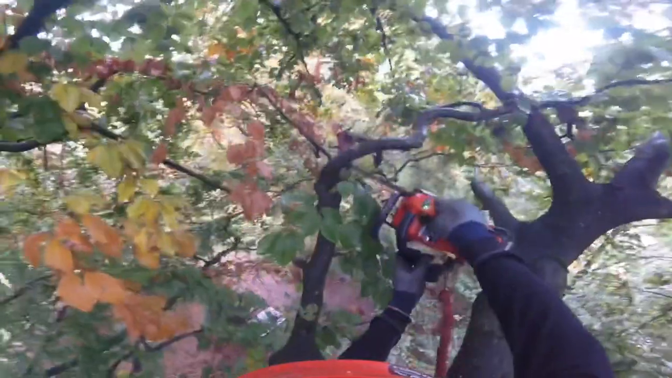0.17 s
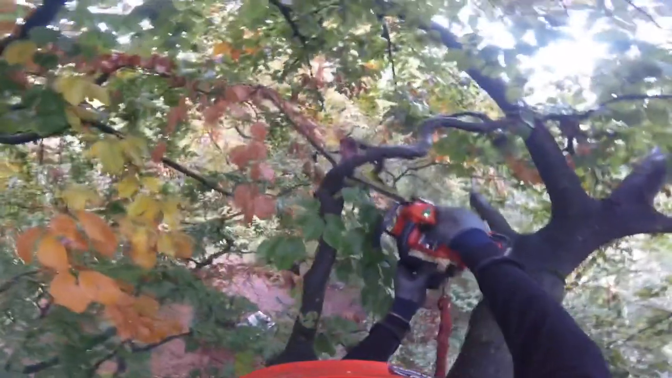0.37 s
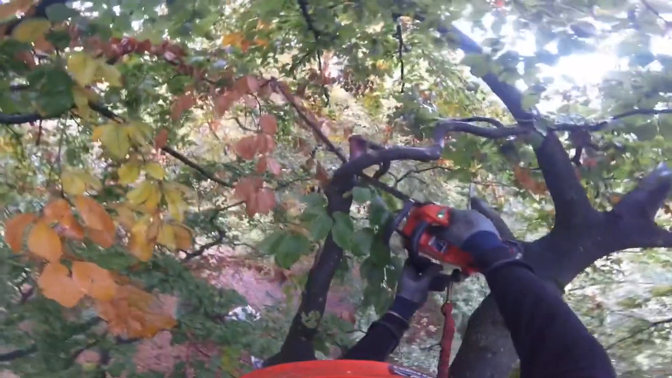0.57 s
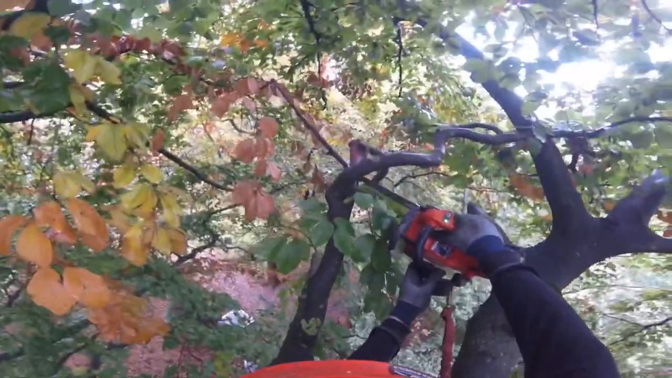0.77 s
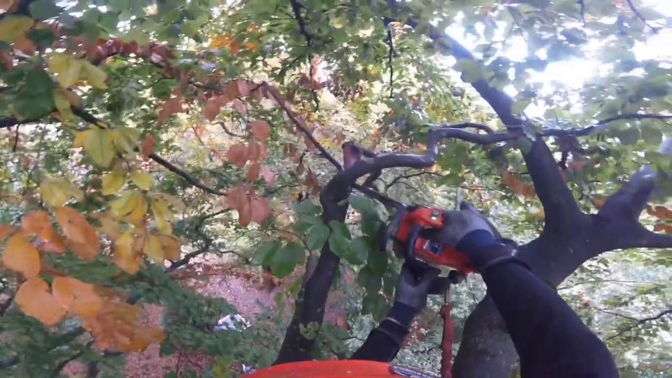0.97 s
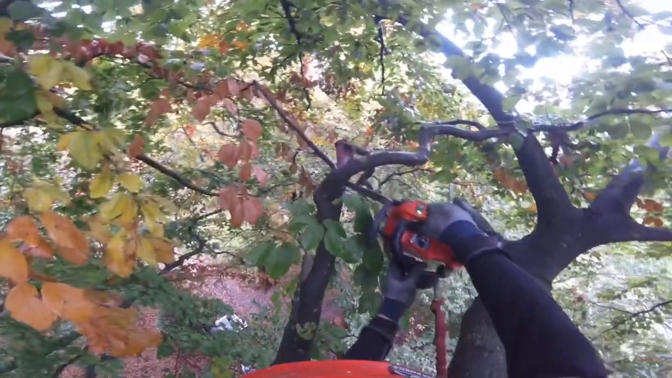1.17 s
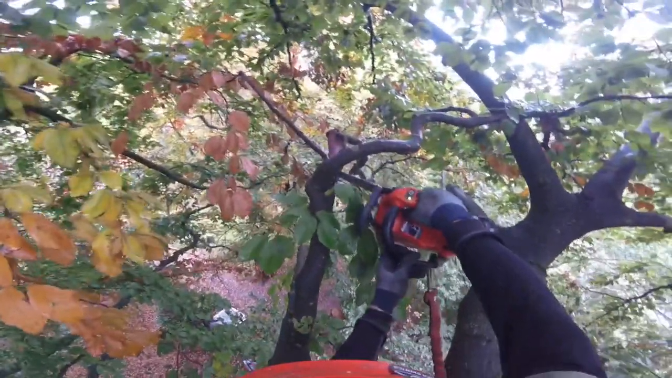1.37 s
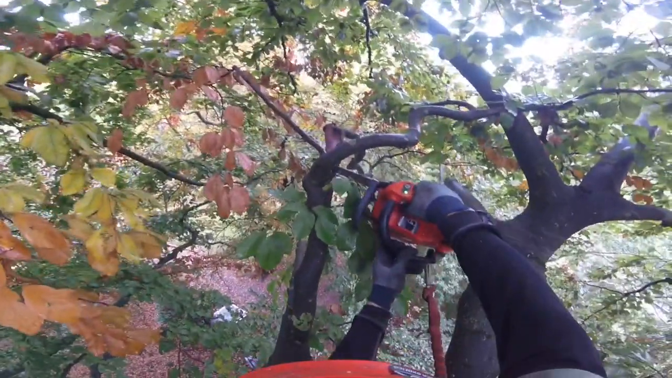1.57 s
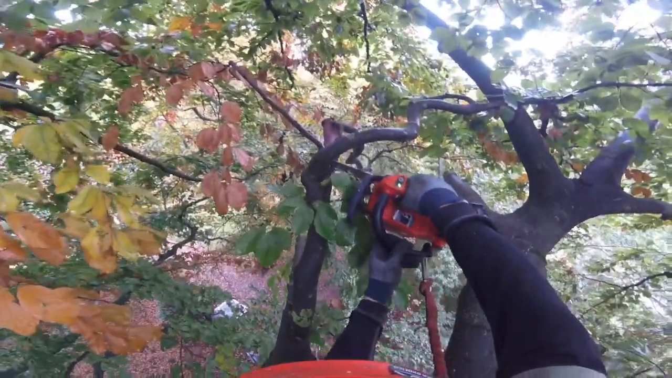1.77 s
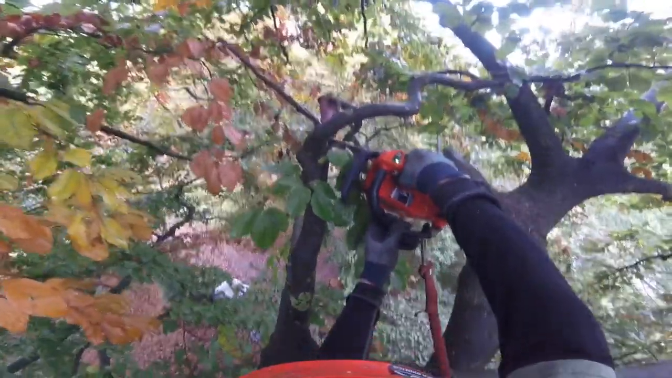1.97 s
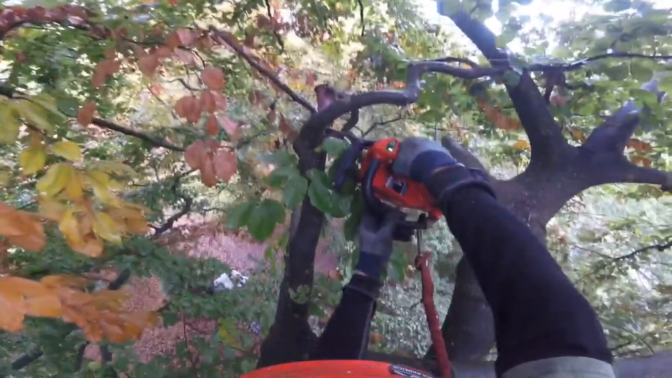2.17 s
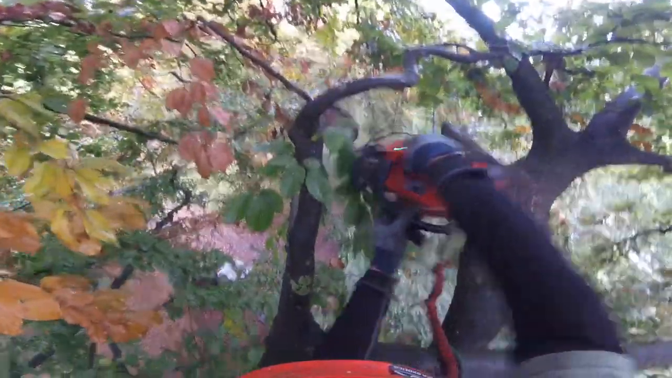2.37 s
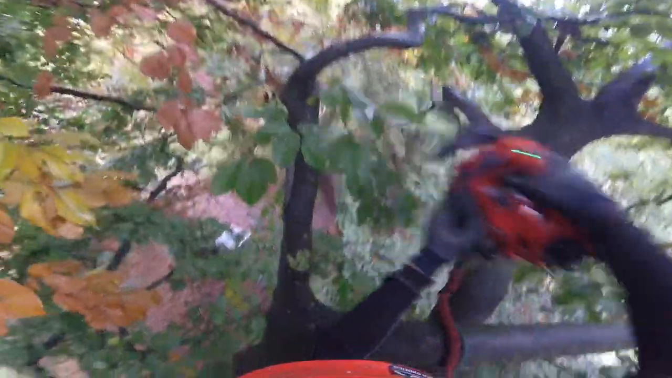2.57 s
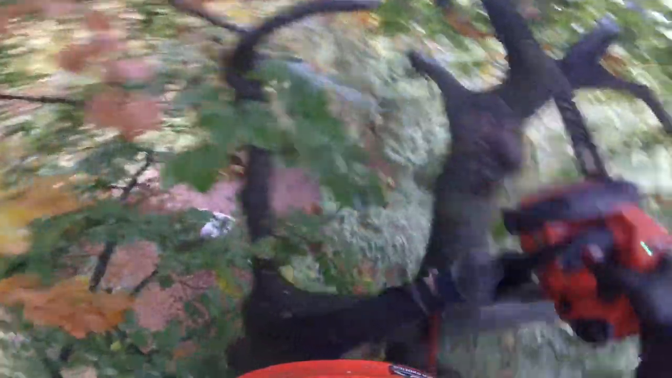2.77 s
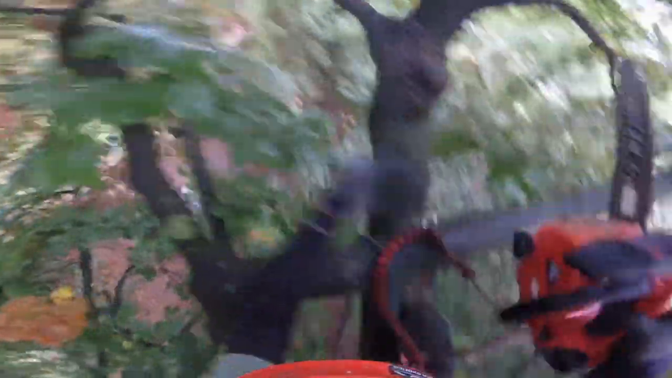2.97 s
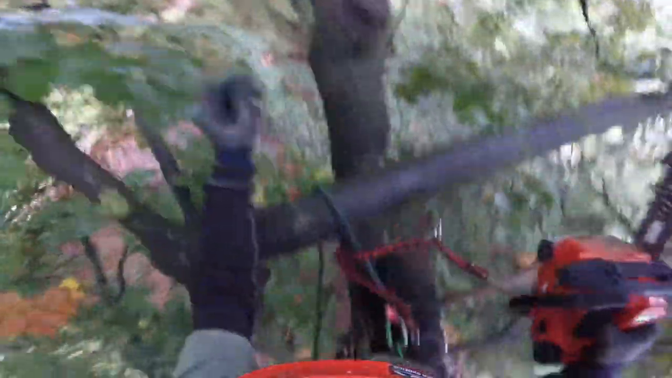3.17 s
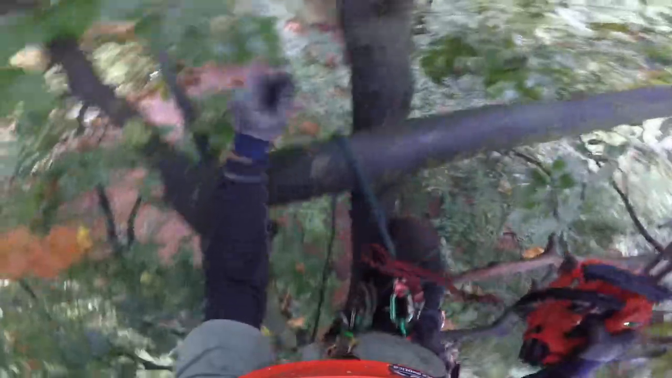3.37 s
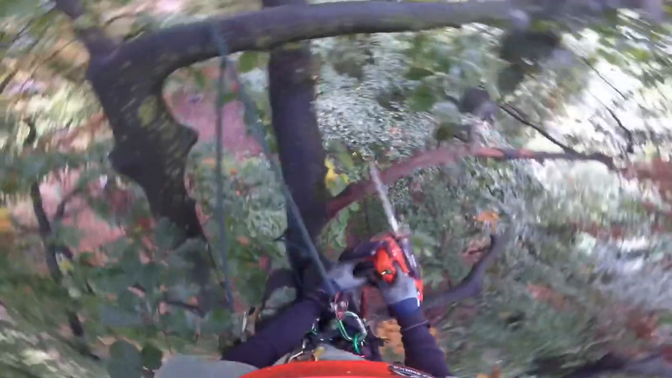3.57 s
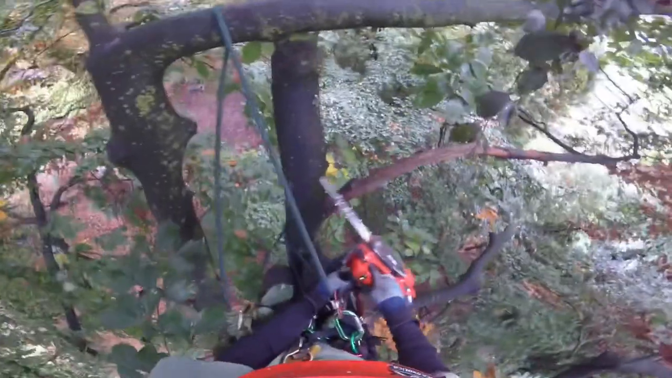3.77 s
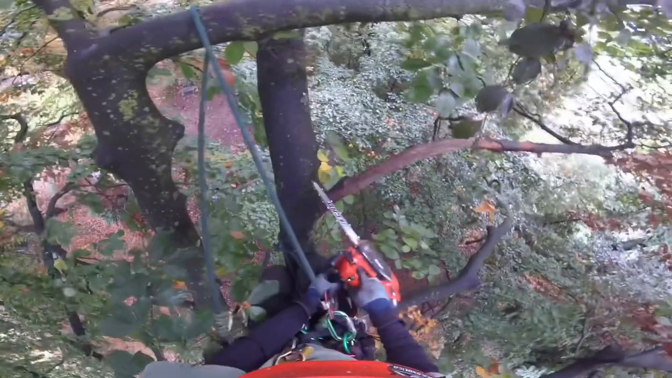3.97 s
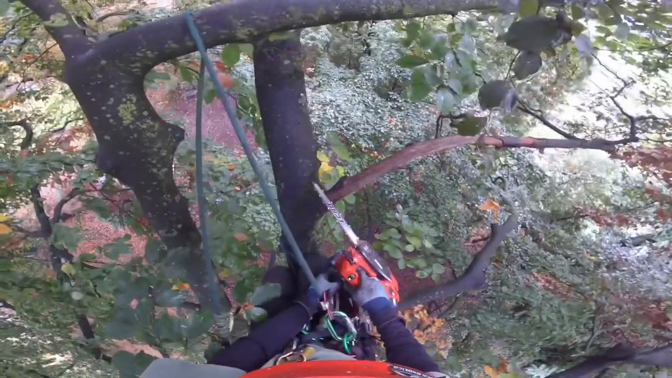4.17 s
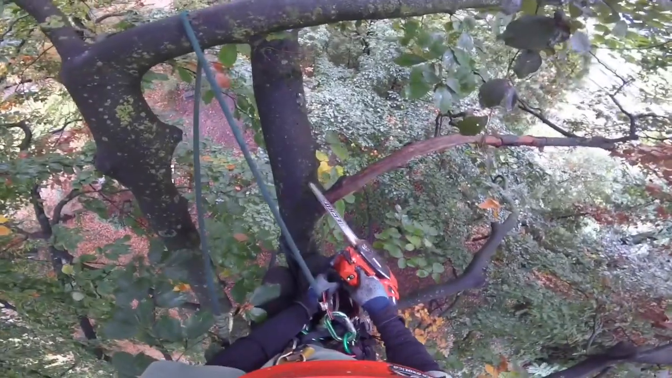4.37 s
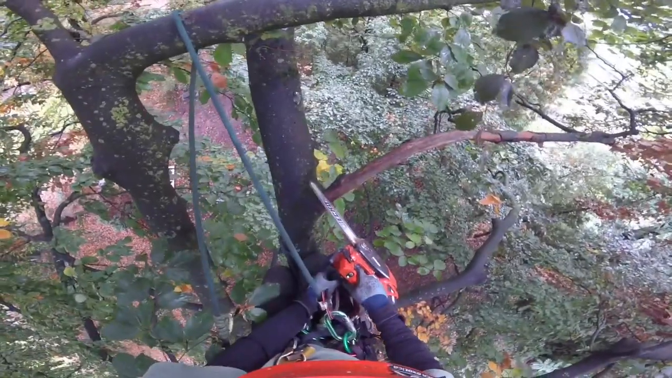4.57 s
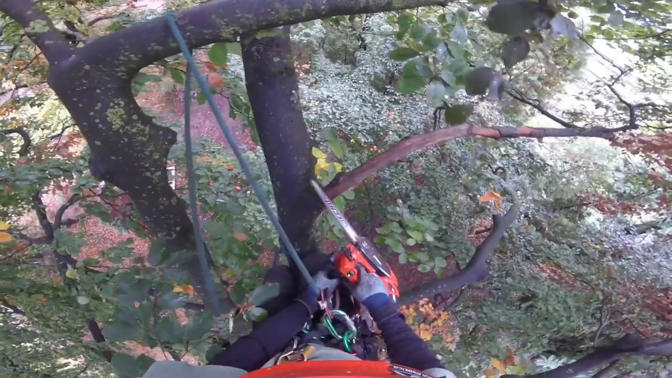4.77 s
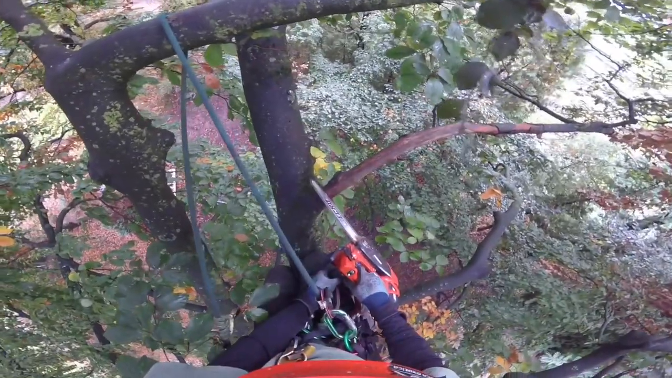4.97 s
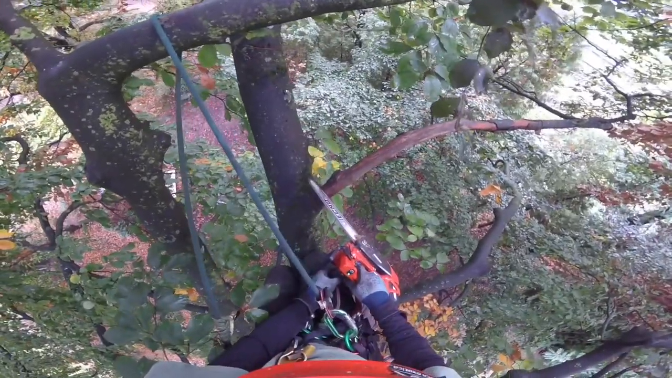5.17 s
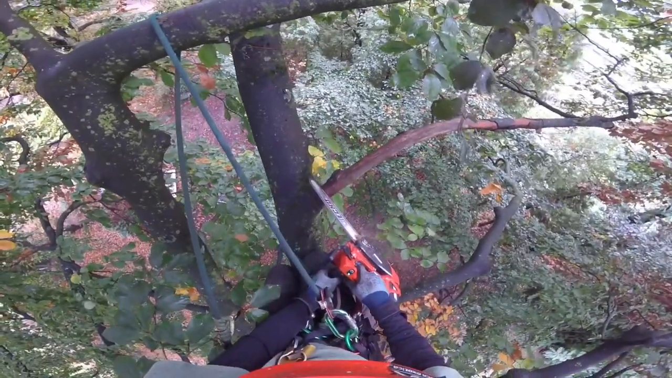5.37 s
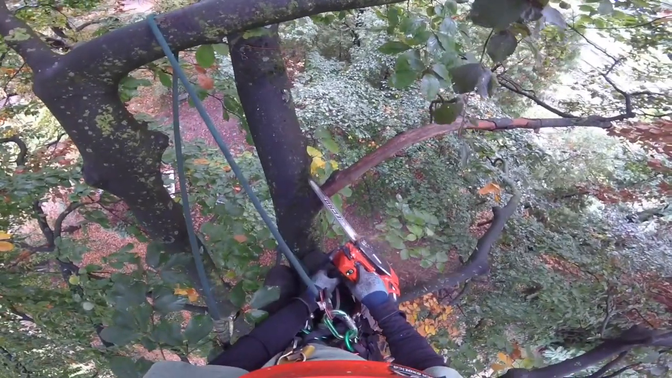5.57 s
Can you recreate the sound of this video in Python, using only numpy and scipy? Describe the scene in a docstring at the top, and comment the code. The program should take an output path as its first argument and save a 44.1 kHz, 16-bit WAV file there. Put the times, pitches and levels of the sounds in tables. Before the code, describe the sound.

After a quiet half second with faint hum and small wood ticks, an electric saw squeals to speed and cuts for under two seconds. A hard crack marks the cut's end and the motor slides down. Leaves and gear brush by, then the saw restarts, lower first, then full. Outdoors, close microphone, mono, low traffic and wind.

```python
"""Battery chainsaw in a tree

A battery chainsaw runs twice, high in a tree and close by. The motor sings lines on multiples of its speed,
shaped noise grains make the chain rattle and the rasp of the teeth, and swept tones start each run.
Decaying partials and noise bursts snap twigs; leaves rustle; filtered noise and a two-tone hum give the
wind and traffic behind. The level dips briefly between the runs. Mono on two channels."""
import sys
import numpy as np
from scipy import signal
from scipy.fft import rfft, irfft
from scipy.io import wavfile
from scipy.ndimage import uniform_filter1d

SR = 44100
rng = np.random.default_rng(int(sys.argv[2]) if len(sys.argv) > 2 else 0)


def inscribe(sig):
    """Save sig as 16-bit PCM at rate SR to the path in sys.argv[1].

    A 1-D sig is mono; a 2-D sig holds one channel per row.
    Samples are clipped to [-1, 1] before scaling.
    """
    pcm = np.round(np.clip(np.atleast_2d(sig).T, -1, 1) * 32767)
    wavfile.write(sys.argv[1], SR, pcm.astype(np.int16))


N = 248283
T = np.arange(N) / SR
FULL_HZ = 620  # pole rate at full speed
DIP_S, DIP_FALL_S, DIP_DB = 3.423, .022, -23


def undb(db):
    """Amplitude from dB."""
    return 10 ** (np.asarray(db) / 20)


def unit(x):
    """Scale to rms 1."""
    return x / np.sqrt(np.mean(x ** 2))


def columns(rows):
    """Each column of a table over time, and a gate that is open while the table lasts."""
    s, *cols = np.transpose(rows)
    return [np.interp(T, s, c) for c in cols], (T >= s[0]) & (T <= s[-1])


def colour(x, points):
    """Shape by (Hz, dB) points on a log frequency axis, rms 1."""
    hz, db = np.transpose(points)
    f = np.fft.rfftfreq(N, 1 / SR) + 1
    gain = undb(np.interp(np.log(f), np.log(hz), db))
    return unit(irfft(rfft(x) * gain, N))


def band(x, order, edges_hz):
    """Band-pass between two edges."""
    return signal.sosfilt(signal.butter(order, edges_hz, "band", fs=SR, output="sos"), x)


def boost(x, peaks):
    """Add resonances (Hz, width Hz, dB) on top of the direct sound."""
    return x + sum(undb(db) * signal.lfilter(*signal.iirpeak(hz, hz / width_hz, SR), x)
                   for hz, width_hz, db in peaks)


def walk(rate_hz):
    """Random levels held for 1 / rate_hz and slewed twice; spread near 1."""
    k = int(SR / rate_hz)
    held = np.repeat(rng.standard_normal(N // k + 1), k)
    return 1.225 * uniform_filter1d(uniform_filter1d(held, k), k)[:N]


def grains(per_s, spread_db):
    """Random clicks of uneven size."""
    hit = rng.random(N) < per_s / SR
    return hit * rng.standard_normal(N) * undb(spread_db * np.minimum(rng.exponential(size=N), 5))


def sing(hz, db, waver_db, rate_hz=40):
    """A sine line whose level (rms) flutters."""
    phase = 2 * np.pi * np.cumsum(hz) / SR
    return np.sqrt(2) * undb(db + waver_db * walk(rate_hz)) * np.sin(phase)


def per_octave(db, hz):
    """Level change for a speed away from full speed."""
    return db * np.log2(hz / FULL_HZ)


# Trigger pulls. Each row: pull in s, whistle in dB, low squeal in dB, high squeal in dB,
# rattle and rasp at full speed without load in dB.
PULLS = [(.662, -34, -21.5, -22, -21.5, -27.5), (4.212, -43, -21, -28, -22, -29.5)]
RATTLE_DB_PER_OCTAVE, RATTLE_LOAD_DB = 8.5, 4
RASP_DB_PER_OCTAVE, RASP_LOAD_DB = 5, 6
SLACK_S, SLACK_DB = 0.042, -2.5


def saw(run):
    """One trigger pull: load raises rattle and rasp, whose levels flutter together; the speed wavers slightly."""
    pull_s, *start_db, rattle_db, rasp_db = PULLS[run]
    hz, load, lowest_db, turning = motion(pull_s, RUNNING[run])

    # the chain rattles less until its slack is taken up
    slack = np.exp(-(np.maximum(T - pull_s, 0) / SLACK_S) ** 6)
    rattle_db = rattle_db + per_octave(RATTLE_DB_PER_OCTAVE, hz) + RATTLE_LOAD_DB * load + SLACK_DB * slack
    rasp_db = rasp_db + per_octave(RASP_DB_PER_OCTAVE, hz) + RASP_LOAD_DB * load

    sweep = sweep_share(hz)
    hz = hz * (1 + 0.002176 * walk(30))  # slight waver of the speed
    shared_flutter = walk(24.89)
    lines = motor_lines(run, hz, load, sweep, lowest_db) + sprocket_lines(hz, rasp_db)
    rattle = undb(rattle_db) * chain_rattle(run, hz, shared_flutter)
    rasp = undb(rasp_db) * teeth_rasp(run, shared_flutter)
    return turning * (lines + rattle + rasp) + start_up(pull_s, *start_db)


# Speed after the first climb, one list per run. Each row: time in s, pole rate in Hz,
# load on the teeth 0-1, level of the line near the pole rate in dB.
RUNNING = [
    [(.79, 419.3, 0.27, -54), (.848, 516.7, 0.1, -34), (.89, 565.6, 0, -39), (.928, 591, 0.5, -36.5),
     (1.0, 600.6, 0.35, -41), (1.2, 613.4, 0.87, -67), (1.6, 620.4, 0.89, -40), (1.7, 610, 0.87, -31.5),
     (1.832, 598.4, 1, -36), (2.014, 623.3, 1, -30), (2.08, 596, 1, -35), (2.125, 582.6, 0.8, -37),
     (2.16, 596.4, .9, -24.5), (2.208, 638.4, 0.66, -36), (2.258, 664.6, 0.13, -30), (2.298, 665.6, 0, -34),
     (2.35, 631, 0, -37.5)],
    [(4.335, 401.4, 0, -60), (4.36, 446, 0, -58), (4.412, 469.6, 0, -45), (4.55, 473, 0, -47),
     (4.634, 525.7, 0, -37.5), (4.712, 576.4, 0.26, -38), (4.808, 628.6, 0.15, -33),
     (4.9, 634.3, 0.08, -33.5), (5.2, 640.6, 0.4, -33), (5.55, 634.4, 0.51, -30), (5.63, 641, 0.37, -33)],
]
SPIN_UP_HZ, SPIN_UP_HZ_PER_S = 70.24, 2700  # pole rate at the pull, and its fastest first climb
COAST_S, DRAG_HZ, STOP_HZ, COAST_DB_PER_OCTAVE = .62, 146.5, 88.7, 10
ATTACK_S = .012


def motion(pull_s, running):
    """Pole rate, load, lowest line dB and gate: climb, run, then coast as speed plus drag decays."""
    (hz, load, line_db), _ = columns([(pull_s, SPIN_UP_HZ, 0, -70), *running])
    climb_hz = SPIN_UP_HZ + SPIN_UP_HZ_PER_S * np.maximum(T - pull_s, 0)
    hz = np.where(T < running[0][0], np.minimum(hz, climb_hz), hz)
    released_s = np.maximum(T - running[-1][0], 0)
    coast_hz = np.maximum((hz + DRAG_HZ) * np.exp(-released_s / COAST_S) - DRAG_HZ, 20)
    line_db = line_db + COAST_DB_PER_OCTAVE * np.log2(coast_hz / hz)
    turning = np.clip((T - pull_s) / ATTACK_S, 0, 1) * (coast_hz > STOP_HZ)
    return coast_hz, load, line_db, turning


FULL_SWEEP_HZ_PER_S, SWEEP_SMOOTH_S = 600, 0.042


def sweep_share(hz):
    """How fast the speed changes, 0-1 of a full sweep."""
    hz_per_s = uniform_filter1d(abs(np.gradient(hz)) * SR, int(SWEEP_SMOOTH_S * SR))
    return np.minimum(hz_per_s / FULL_SWEEP_HZ_PER_S, 1)


# Motor lines, saw held high, then low. Each row: multiple of the pole rate, level at steady free
# full speed before the casing in dB, change under full load in dB, change in a full sweep in dB.
MULTIPLES = [
    [(2, -31.5, -3.5, 5.5), (3, -40, -3, 0.5), (4, -35, 2.5, -5.5), (4.5, -36.5, -1, -7), (5, -49, -5, 0),
     (6, -44.5, 3, 3.5), (7, -47.5, 0., 4.5), (8, -47, 3, 2.5)],
    [(2, -34, -1, 3), (3, -51, 0, 12), (4, -37.5, -9, 2.5), (4.5, -40, 2, -6), (6, -40.5, 0., -7),
     (8, -41.5, 14.5, -5)],
]
# Casing gain on the motor lines, saw held high, then low. Each row: frequency in Hz, gain in dB.
CASING = [
    [(300, -15), (600, -3), (870, -1), (1000, 4), (1150, 0.5), (1250, -7), (1340, 6.5), (1550, 9.5),
     (1900, 0), (2450, 4), (3100, 1.5), (3700, -6.5), (5200, 8)],
    [(400, -12), (600, 2), (740, 4), (870, -13), (960, -3.5), (1190, 4), (1250, -3), (1450, -5), (1700, 4),
     (1950, -15), (2400, 6), (2700, -1.5), (3700, -0.5), (5200, 3.5)],
]
LINE_DB_PER_OCTAVE = 7


def motor_lines(run, hz, load, sweep, lowest_db):
    """Multiples of the pole rate through the casing; higher multiples flutter more and faster."""
    def flutter(k, db):
        return sing(k * hz, db, waver_db=.8 + .38 * k, rate_hz=30 + 10 * k)

    lines = flutter(0.99, lowest_db)  # the lowest line bypasses the casing
    for k, db, load_db, sweep_db in MULTIPLES[run]:
        casing_db = np.interp(k * hz, *np.transpose(CASING[run]))
        speed_db = per_octave(LINE_DB_PER_OCTAVE, hz)
        lines = lines + flutter(k, db + load_db * load + sweep_db * sweep + casing_db + speed_db)
    return lines


# Shaft and sprocket lines. Each row: multiple of the shaft rate, level against the rasp in dB.
SPROCKET = [(1, -26.5), (2, -29), (3, -25.5), (5, -20.5), (6, -25.5), (9, -18.5), (10, -25.5), (11, -27),
            (13, -21.5), (20, -32)]


def sprocket_lines(hz, rasp_db):
    """Lines on multiples of the shaft rate, a quarter of the pole rate."""
    return sum(sing(k * hz / 4, rasp_db + db, waver_db=4.0) for k, db in SPROCKET)


# Chain rattle spectrum, saw held high, then low. Each row: frequency in Hz, relative density in dB per Hz.
RATTLE = [
    [(200, -42), (1000, -24), (2500, -13), (4000, -14), (5000, -5.5), (6000, -7.5), (8000, -9),
     (10000, -13), (11500, -30), (14000, -33)],
    [(200, -40), (1000, -20.5), (2500, -10.5), (4000, -8.5), (5000, -5), (6000, -8.5), (7200, -4.5),
     (10000, -15), (11500, -29), (14000, -27)],
]
# Microphone cavity resonances. Each row: frequency in Hz, width in Hz, gain in dB.
HOUSING = [(5665, 630, 9.5), (6510, 320, 7.5)]


def chain_rattle(run, hz, shared_flutter):
    """Dense clicks of chain on bar; the top dulls as the chain slows."""
    rattle = unit(boost(colour(grains(22000, spread_db=1.0), RATTLE[run]), HOUSING))
    rattle = rattle * undb(0.97 * shared_flutter + 0.38 * walk(90))
    dull = signal.sosfiltfilt(signal.butter(2, 8500, fs=SR, output="sos"), rattle)
    return dull + (rattle - dull) * (hz / FULL_HZ) ** 0.13


# Rasp spectrum, first run, then second run. Each row: frequency in Hz, relative density in dB per Hz.
RASP = [
    [(100, -38), (160, -15.5), (340, -9), (600, -6), (1200, -4), (2300, -2), (3000, -7), (4500, -11),
     (8000, -52)],
    [(100, -14.5), (160, -24.5), (340, -12), (600, -6.5), (900, -9.5), (1500, -2.5), (2300, -8),
     (3000, -11.5), (4500, -15), (8000, -50)],
]
# Bar and casing resonances, first run, then second run. Each row: frequency in Hz, width in Hz, gain in dB.
BODY = [
    [(704, 36, 5), (957, 160, -1), (1556, 63, 0), (1890, 160, -4.5)],
    [(670, 170, -6), (1530, 19, 4), (1677, 25, 2), (2370, 160, 3)],
]


def teeth_rasp(run, shared_flutter):
    """Random tooth clicks ringing the bar and casing."""
    rasp = unit(boost(colour(grains(9000, spread_db=-0.03), RASP[run]), BODY[run]))
    return rasp * undb(0.27 * shared_flutter + 1.17 * walk(70))


# Drive electronics whistle. Each row: time after the pull in s, frequency in Hz,
# level against the whistle level of the pull in dB.
WHISTLE = [(.004, 2680, -22), (.02, 2840, -1), (.05, 2820, 4), (.098, 2920, -1), (.128, 2930, -9)]
# Start-up chirp through the casing. Each row: time after the pull in s, frequency in Hz.
CHIRP = [(.012, 801), (.022, 1000), (.032, 1440), (.042, 1850), (.054, 2170), (.098, 2500), (.113, 2700),
         (.126, 2800), (.138, 3050)]
SQUEALS_S, SQUEAL_DB_PER_MS, CHIRP_FLOOR_DB = (.032, .113), 1.5, -48  # after the pull; fall on either side


def start_up(pull_s, whistle_db, *squeal_db):
    """Electronics whistle and a rising chirp that squeals twice as the motor starts."""
    (hz, db), whistling = columns(np.add(WHISTLE, [pull_s, 0, whistle_db]))
    whistle = sing(hz * (1 + 0.027 * walk(300)), db, waver_db=4.0, rate_hz=170)
    (chirp_hz,), chirping = columns(np.add(CHIRP, [pull_s, 0]))
    peaks_db = [top_db - SQUEAL_DB_PER_MS * 1000 * abs(T - pull_s - s)
                for s, top_db in zip(SQUEALS_S, squeal_db)]
    chirp_db = np.maximum(np.maximum(*peaks_db), CHIRP_FLOOR_DB)
    return whistling * whistle + chirping * sing(chirp_hz, chirp_db, waver_db=4.5)


# Snaps and knocks of wood. Each row: time in s, knock peak in dB, pitch in Hz,
# crack drive before filtering in dB.
SNAPS = [(.011, -35, 670, -36), (0.02, -35, 910, -35), (0.034, -34, 706, -37), (0.063, -42, 900, -40),
         (0.3956, -36, 1500, -39), (0.4164, -31, 1750, -33), (0.4212, -27, 1260, -43),
         (.433, -36, 1300, -38), (0.663, -25, 1360, -28), (.675, -21.5, 258, -27),
         (0.7505, -14, 1540, -11.5), (0.852, -10, 790, -30), (0.873, -10, 1100, -30),
         (2.088, -28, 1550, -15), (2.165, -9, 585, -23), (2.224, -18, 1385, -13), (2.231, -8, 1247, -8),
         (2.238, -13, 1330, -16), (3.0587, -16.5, 559, -24), (3.141, -19, 560, -32), (3.153, -23, 525, -32),
         (3.166, -31, 497, -24), (3.219, -36.5, 930, -28), (3.5193, -27.5, 189, -31.5),
         (3.7086, -53, 890, -54), (4.221, -26, 2200, -25), (5.155, -18, 641.6, -10), (5.488, -16, 1900, -9)]
# Partials of a knock. Each row: pitch ratio, relative level in dB, share of the ring time.
TWIG = [(1, -1.5, 0.77), (1.75, 1, 0.49), (2.9, -9.5, 0.72), (4.0, -2.5, 0.44), (5.0, -12, 0.24)]
RING_CYCLES, LONGEST_RING_S, CRACK_S = 22, .042, .033  # to fall by 60 dB
PART_S = .00027  # fibres part over a fraction of a millisecond


def snaps():
    """Each snap is a knock of decaying partials and a short bright crack of noise."""
    knocks, cracks = np.zeros(N + 4096), np.zeros(N + 4096)
    t = np.arange(4096) / SR
    rise = 1 - np.exp(-t / PART_S)
    for s, knock_db, hz, crack_db in SNAPS:
        i = int(s * SR)
        ring_s = min(RING_CYCLES / hz, LONGEST_RING_S)
        ring = rise * sum(undb(db) * np.sin(2 * np.pi * ratio * hz * t) * 1000. ** (-t / (ring_s * share))
                          for ratio, db, share in TWIG)
        knocks[i:i + len(t)] -= undb(knock_db) * ring / np.abs(ring).max()
        cracks[i:i + len(t)] += undb(crack_db) * rise * 1000. ** (-t / CRACK_S)
    splinters = boost(cracks[:N] * rng.standard_normal(N), HOUSING)
    return knocks[:N] + .5 * band(splinters, 3, [1800, 7600])


# Leaves and gear brushing past. Each row: time in s, level before flutter in dB.
RUSTLE = [(2.9, -55), (2.98, -34.5), (3.1, -35.5), (3.15, -29), (3.39, -44), (3.42, -48)]
# Leaf spectrum. Each row: frequency in Hz, relative density in dB per Hz.
LEAVES = [(120, -38), (200, -9.5), (568, -7), (632, -9.5), (4050, -11), (5580, 0.5), (9820, -19.5),
          (13800, -62)]


def rustle():
    """Dense dry grains of leaves with a fluttering level."""
    (db,), brushing = columns(RUSTLE)
    leaves = colour(grains(14000, spread_db=0.0), LEAVES)
    return brushing * undb(db + 1.4 * walk(60)) * leaves


def background_level(before_after_db, drift_db):
    """Amplitude from a level before and one after the middle of the dip, plus drift."""
    return undb(np.where(T < DIP_S, *before_after_db) + drift_db)


RUMBLE_DB = (-44.5, -49)  # before and after the dip


def wind_rumble():
    """Slowly drifting noise in a low band."""
    rumble = unit(band(rng.standard_normal(N), 2, [30, 68]))
    return background_level(RUMBLE_DB, 1.2 * walk(2.875)) * rumble


DRONE_DB = (-48, -58)  # before and after the dip
GUST_S, GUST_LASTS_S, GUST_DB = 2.85, .09, 11


def low_drone():
    """Noise in a narrow low band that swells once."""
    drone = unit(band(rng.standard_normal(N), 2, [72, 102]))
    gust_db = GUST_DB * np.exp(-((T - GUST_S) / GUST_LASTS_S) ** 2)
    return background_level(DRONE_DB, gust_db + 2 * walk(4.03)) * drone


# Distant traffic spectrum. Each row: frequency in Hz, relative density in dB per Hz.
FAR = [(65, -40), (110, -5), (190, -4), (210, -8.5), (242, -4), (262, -9.5), (409, -12), (481, -14.5),
       (936, -9), (1220, -16), (1520, -18), (4170, -37), (6640, -25), (8300, -37.5), (13800, -52)]
TRAFFIC_DB = (-46, -46)  # before and after the dip


def distant_traffic():
    """Coloured noise that drifts a little."""
    far = colour(rng.standard_normal(N), FAR)
    return background_level(TRAFFIC_DB, 0.51 * walk(5.4)) * far


# Faint far hum. Each row: time in s, frequency in Hz, level in dB, octave against it in dB.
HUM = [(0, 241, -43, -12), (.07, 236, -54.5, -9), (.14, 242.5, -48.5, 4), (.2, 229, -58, 7),
       (.33, 247.5, -56.5, -1), (.45, 256, -65, 4)]


def far_hum():
    """A gliding, wavering tone and its octave."""
    (hz, db, octave_db), on = columns(HUM)
    return on * (sing(hz, db, waver_db=1.5) + sing(2 * hz, db + octave_db, waver_db=1.5))


def scene():
    """Both runs, wood, leaves and background, dipped together, on two equal channels."""
    background = wind_rumble() + low_drone() + distant_traffic() + far_hum()
    dip_db = DIP_DB * np.maximum(1 - abs(T - DIP_S) / DIP_FALL_S, 0)
    mono = (saw(0) + saw(1) + snaps() + rustle() + background) * undb(dip_db)
    return np.array([mono, mono])


TOP_HZ = 13900


def record(dry):
    """The camera cuts the top with a steep low-pass."""
    return signal.sosfilt(signal.ellip(10, .2, 75, TOP_HZ, fs=SR, output="sos"), dry)


dry = scene()
out = record(dry)
inscribe(out)
```